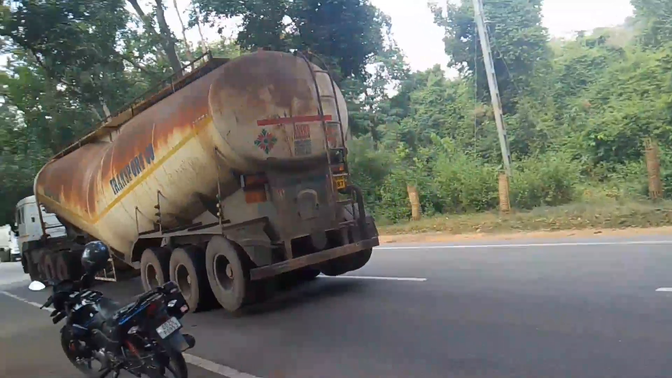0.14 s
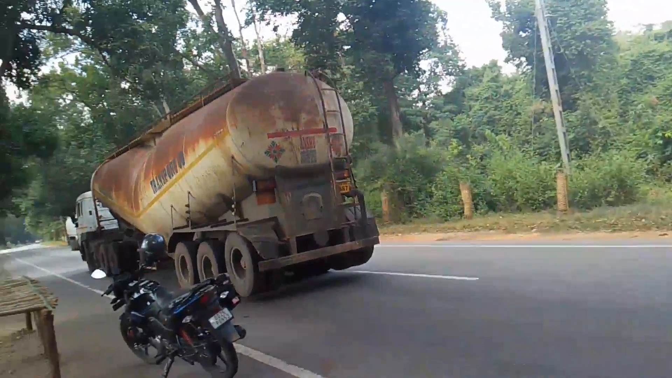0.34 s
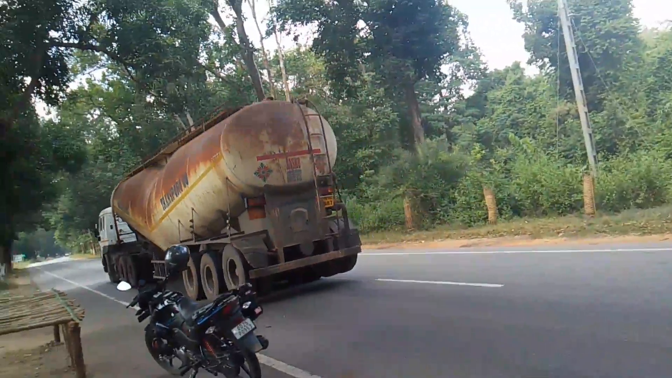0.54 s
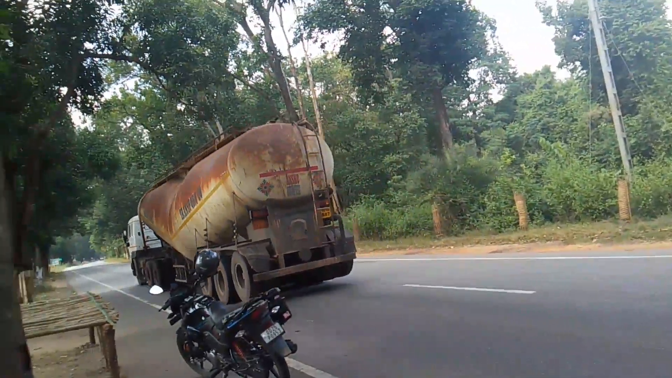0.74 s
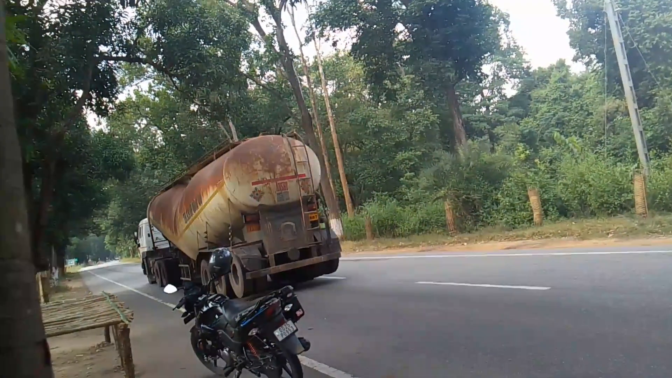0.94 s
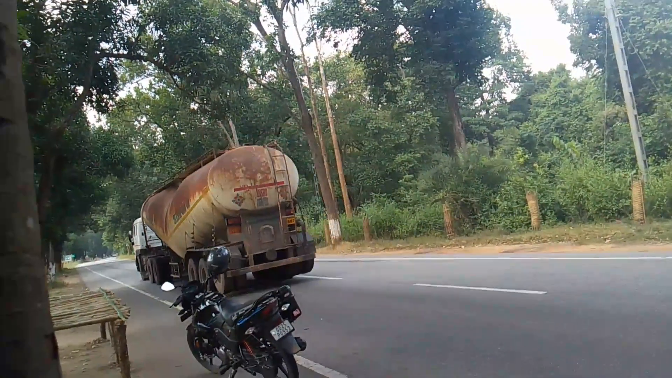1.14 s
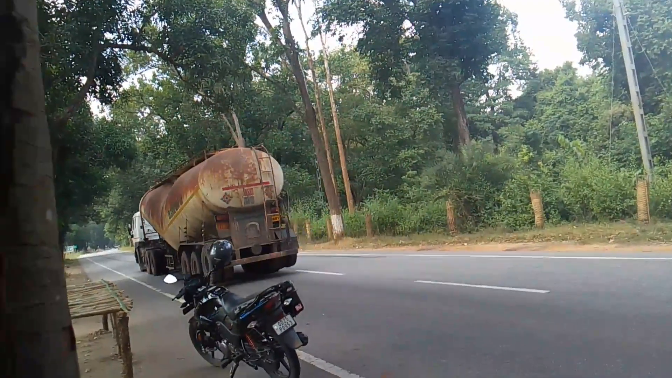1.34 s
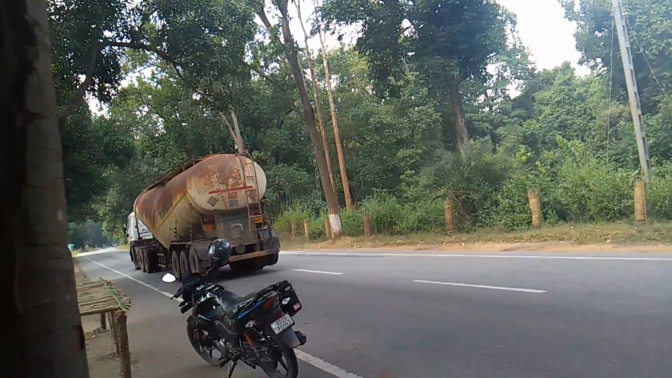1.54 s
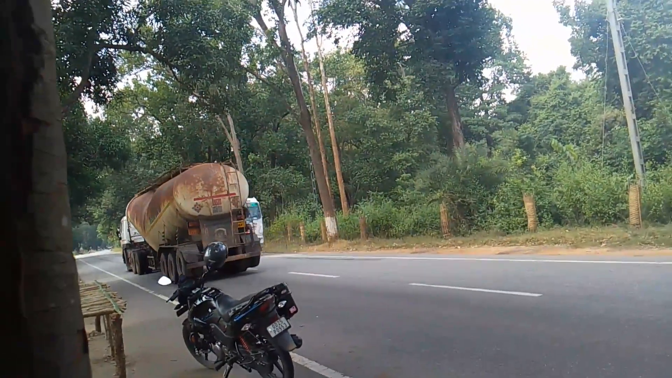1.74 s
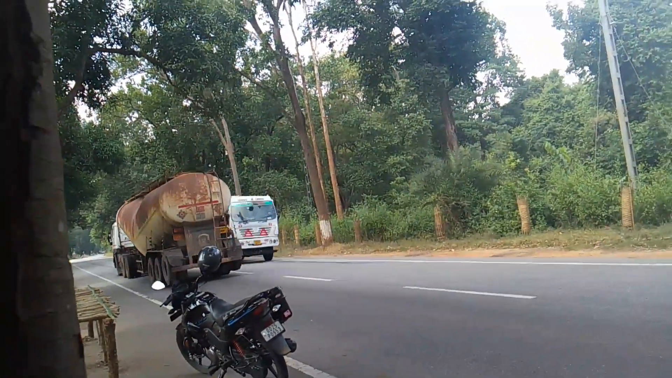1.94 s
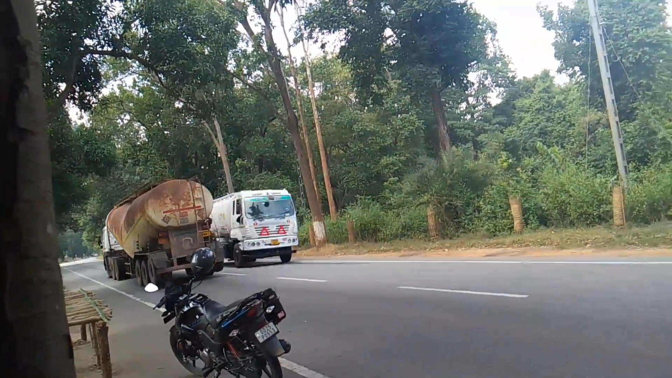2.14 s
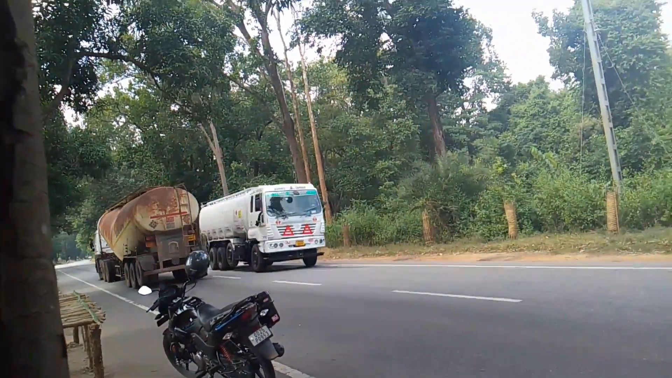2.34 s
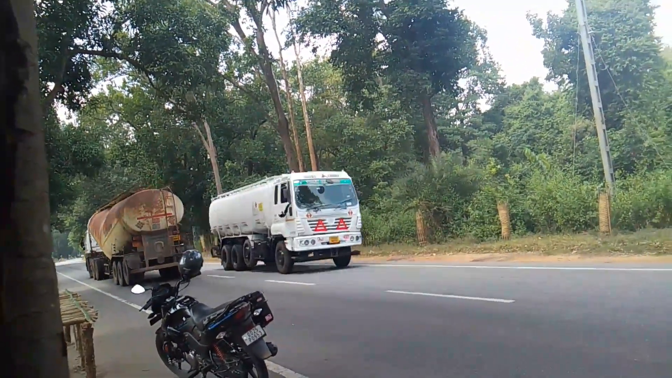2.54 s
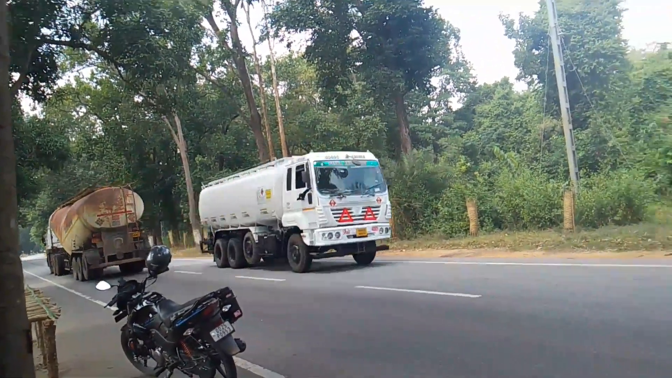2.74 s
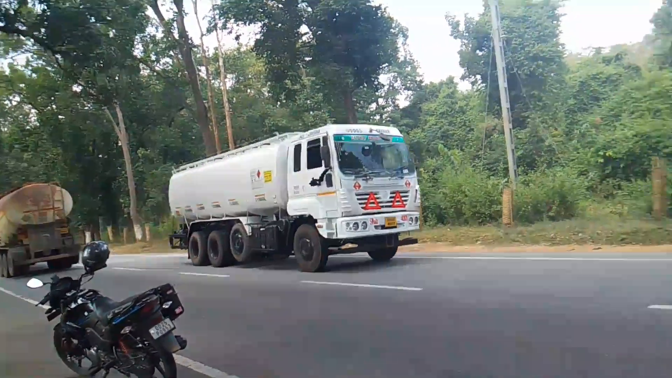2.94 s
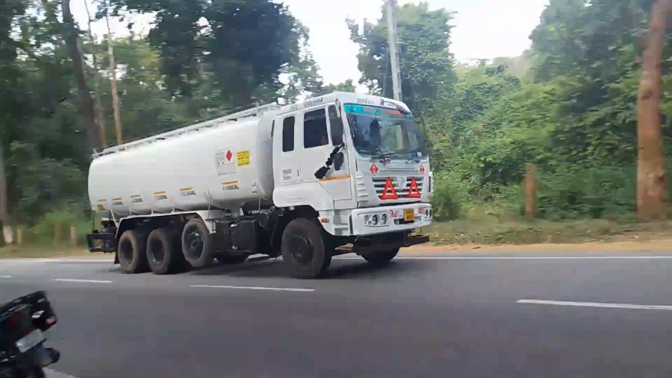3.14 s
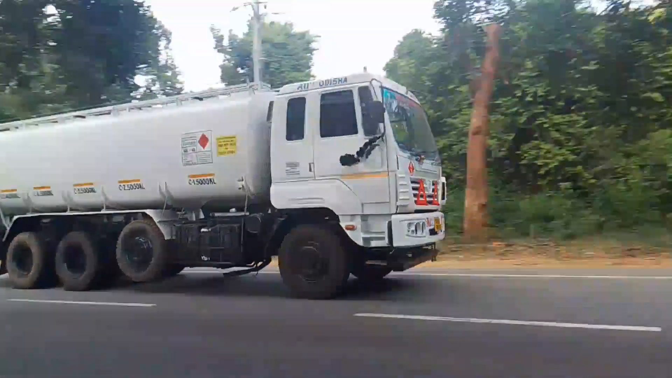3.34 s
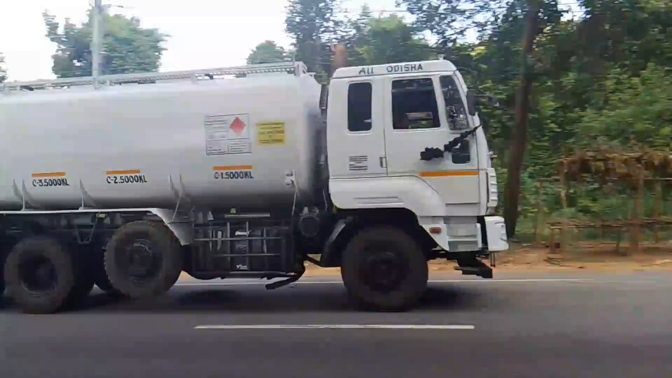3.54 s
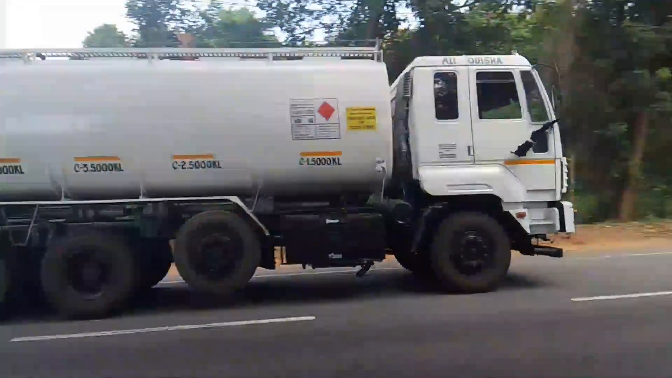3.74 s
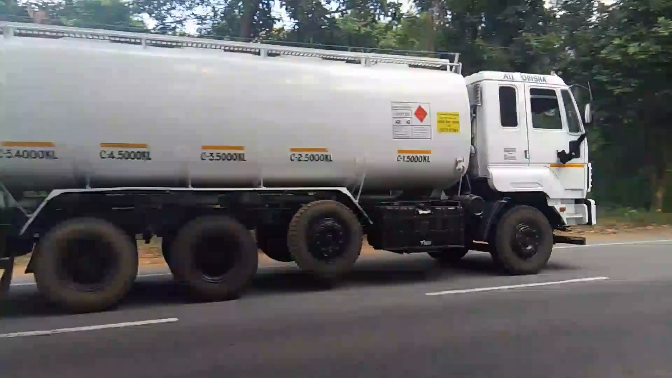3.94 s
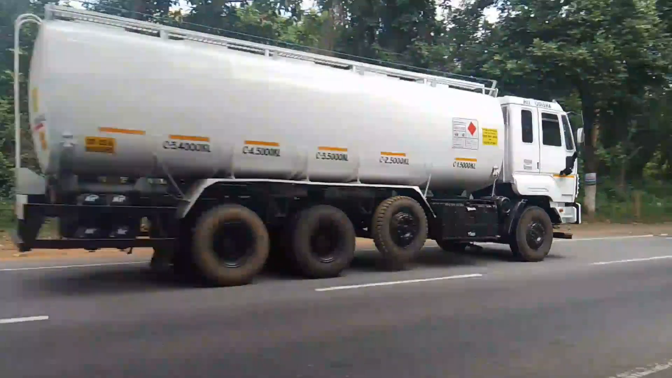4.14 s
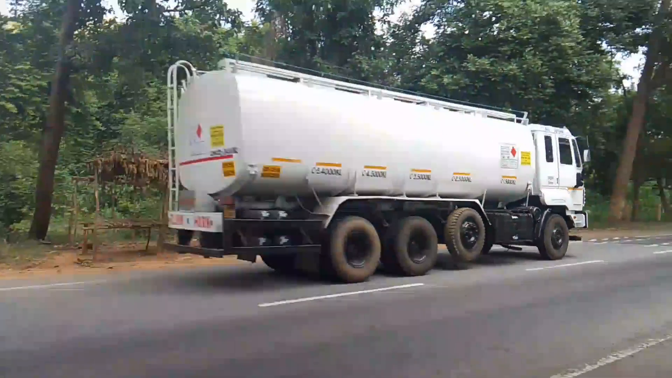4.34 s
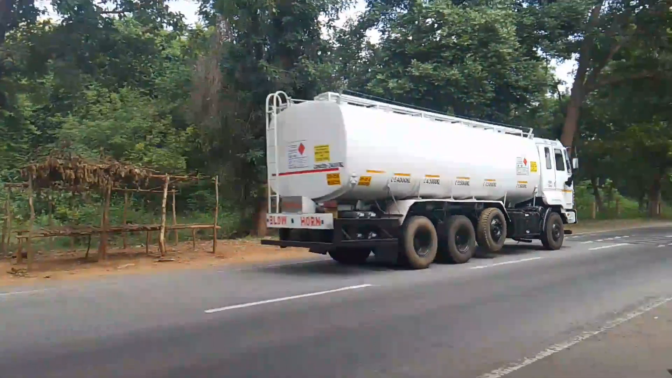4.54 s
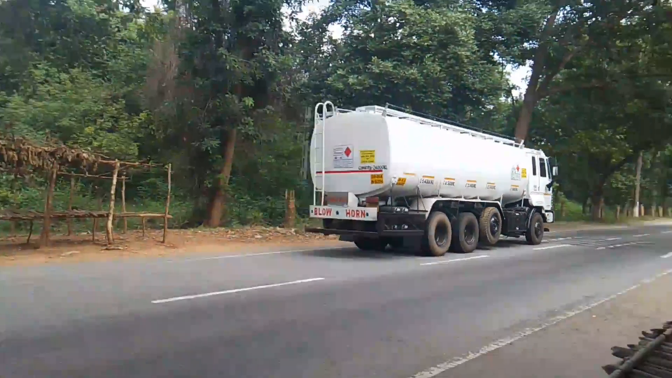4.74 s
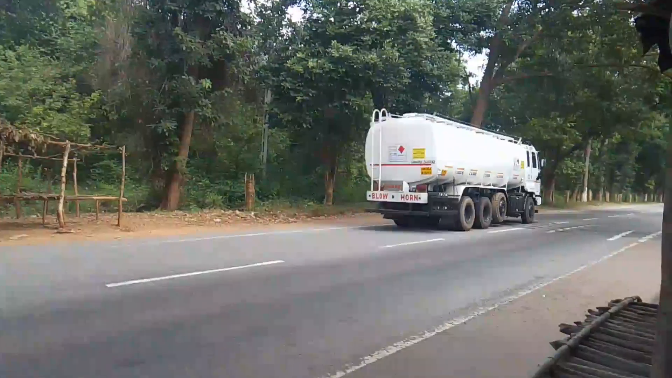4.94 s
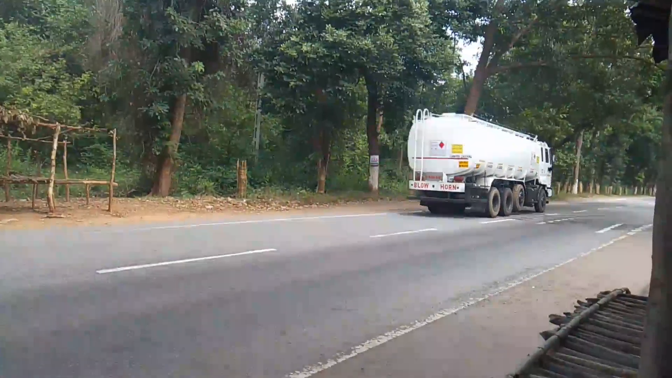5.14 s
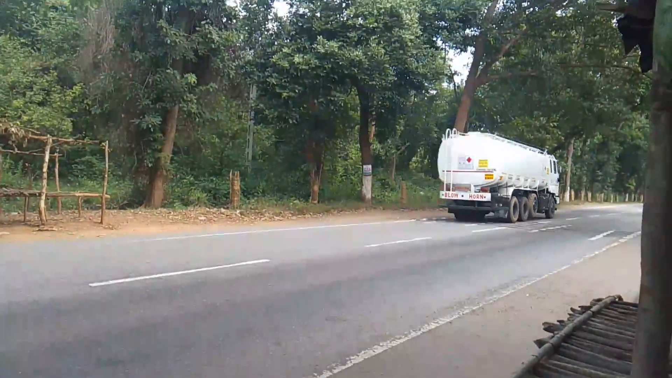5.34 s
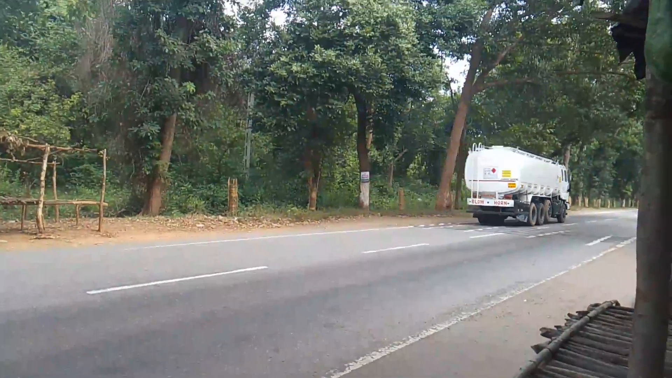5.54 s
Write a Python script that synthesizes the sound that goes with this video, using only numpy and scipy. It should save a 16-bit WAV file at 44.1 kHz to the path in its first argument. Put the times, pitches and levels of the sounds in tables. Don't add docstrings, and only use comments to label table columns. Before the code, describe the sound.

Roadside truck pass: deep steady engine hum recedes, then a second tanker's tyre roar and strong tonal whine swell, peak and fade.

```python
import sys
import numpy as np
from scipy import signal
from scipy.fft import rfft, irfft, next_fast_len
from scipy.io import wavfile
from scipy.ndimage import uniform_filter1d

SR = 44100
rng = np.random.default_rng(int(sys.argv[2]) if len(sys.argv) > 2 else 0)


def amplitude_ratio(level_db):
    exponent = np.asarray(level_db, float) / 20
    return 10 ** exponent


def log_audio(samples):
    frames = np.atleast_2d(samples).T
    limited = np.clip(frames, -1, 1)
    pcm = np.round(limited * 32767).astype(np.int16)
    wavfile.write(sys.argv[1], SR, pcm)


N = 246959
T = np.arange(N) / SR
SPEED_M_S, LANE_M = 14.5, 6

# (time [s], level [dB])
WHINE = [
    (1.4, -68),
    (2.1, -42.5),
    (2.75, -37.5),
    (3.63, -34),
    (3.68, -21),
    (4.25, -16.5),
    (4.66, -26),
    (5.1, -26),
    (5.6, -35.5),
]
# (time [s], change [dB], half-width [s])
BEATS = [(1.93, -15, 0.032), (2.136, 2, 0.027), (2.33, -22, 0.041), (2.42, 9, 0.019), (2.475, -11, 0.014),
         (2.648, 12, 0.0074), (2.87, 5.5, 0.026), (2.92, -17, 0.018), (3.0, 3, .03), (3.08, -12, 0.014),
         (3.11, 7.5, .02), (3.225, -15, .03), (3.48, -2, .03), (3.54, 9, 0.012), (3.57, -8, .012),
         (3.76, 0, .02), (3.83, -7, .022), (3.88, -1, .015), (3.98, -2, 0.034), (4.25, -10, 0.032),
         (4.3, 3.5, 0.021), (4.42, 0, .03), (4.61, -10, 0.0076), (4.64, 2.5, 0.0098), (4.71, -22, 0.021),
         (4.77, 4.5, 0.013), (4.84, -7, 0.029), (4.94, -14, 0.012), (5.07, 0.5, .05), (5.19, -12, 0.011),
         (5.24, -10, 0.02), (5.28, 1, 0.013), (5.33, -13, .01), (5.36, 4, .012), (5.39, -21, 0.015)]
# (time [s], change [dB], half-width [s])
OCTAVE_BEATS = [(2.02, -6, 0.033), (2.28, -7, .04), (2.45, 3, .04), (2.66, -3, 0.036), (2.86, 5, 0.045),
                (2.96, 3, 0.027), (3.04, -4, 0.019), (3.24, -3, 0.035), (3.45, -4, 0.051),
                (3.93, -8, 0.022), (4.2, -10, 0.037), (4.29, 6.5, 0.024), (4.82, -1, 0.049)]
# (time [s], pitch [Hz])
LEAD_AXLE = [(0, 253.1), (3.3, 252), (3.55, 250.3), (3.78, 248), (3.83, 245.7), (3.91, 248), (3.98, 243.8),
             (4.16, 244.1), (4.22, 238.3), (4.36, 238.4), (4.45, 235.3), (4.76, 235.5), (4.88, 232.2),
             (5.23, 233.5), (5.32, 229.7), (5.6, 230.8)]


def treads():
    block_hz, pass_s = 243.5, 4.1
    along = SPEED_M_S * (T - pass_s)
    closing = along / np.hypot(along, LANE_M)
    hz = block_hz / (1 + SPEED_M_S / 343 * closing)

    blur = np.interp(T, [3.4, 3.7, 5.2, 5.4], [0.014, 0.0059, 0.004, 0.014])
    lead = tone(columns(LEAD_AXLE)[0] * (1 + blur * walk(25)))
    stray = tone(hz * (1.03 + 0.018 * walk(24.67)))
    first_db = columns(WHINE)[0] + swells(BEATS, T) + 1.7 * walk(30)

    octave_db = -39 + 0.66 * nearness(T, 3.81, SPEED_M_S) + 2 * shadow(T) + swells(OCTAVE_BEATS, T)
    front_db = np.interp(T, [2.2, 2.4, 3.2, 3.6], [7.5, 4.5, 2.0, -1.5])
    spread = np.interp(T, [3.3, 3.8], [1, 0.35])
    octave = 0
    for detune, axle_db in [(-0.01, -1), (0.02, 2), (0.07, -3)]:
        axle_hz = 2 * hz * (1 + spread * (detune + 0.011 * walk(30)))
        octave = octave + amplitude_ratio(axle_db + 3.5 * walk(14)) * tone(axle_hz)
    upper = 0
    for multiple in (2.45, 3, 3.15, 4, 5):
        upper_hz = multiple * hz * (1 + 0.012 * walk(40))
        upper = upper + amplitude_ratio(-2 * multiple + 4 * walk(25)) * tone(upper_hz)
    overtones = amplitude_ratio(front_db - 5) * octave + amplitude_ratio(-3 - 2 * front_db) * upper
    return amplitude_ratio(first_db) * (lead + amplitude_ratio(-27) * stray) + amplitude_ratio(octave_db) * overtones


# (level abreast [dB], abreast at [s], fall-off re 6 dB per doubling [ratio], source half-length [m])
PASSING = [(-32.5, 4, 0.89, 2.8), (-31.5, 3.97, 1, 2.6), (-36.5, 4.09, 0.9, 9.5), (-46, 4.06, 0.87, 2.6),
           (-48.5, 4.13, 1.2, 0.51)]
# (frequency [Hz], level [dB per Hz])
PASSING_LOW = [(20, -20), (48, -7), (90, -2), (140, -5.5), (180, 2.5), (250, 1)]
PASSING_TONE = [(300, -5), (410, -7), (480, -4.5), (730, -6), (1690, -12), (1930, -16.5), (3850, -19.5),
                (5500, -33), (7500, -35), (10200, -42.5), (11500, -42), (13000, -54.5), (15500, -51)]


def passing_tyres():
    return rolling(PASSING, SPEED_M_S, 1, PASSING_LOW + PASSING_TONE,
                   patchy_db=1.35, flicker_db=-0.12, air=0.37, rear_db=8.5)


# (lowest [Hz], highest [Hz])
BANDS_HZ = [(85, 200), (560, 1000), (1000, 1700), (2200, 5000), (6000, 10500)]
# (time [s], change [dB], half-width [s])
BUMPS = [(0.0, 0.5, 0.046), (0.9, -3, 0.14), (1.2, 3.5, 0.28), (1.75, 3, 0.18), (2.7, 2, 0.12),
         (3.7, 0, 0.073), (4.25, 4, 0.049), (4.55, 3.5, 0.063), (4.92, 0, 0.091), (5.28, 2.5, 0.076),
         (5.45, 4, .04), (5.58, 5, 0.044)]
# (time [s], change [dB], half-width [s])
PUFFS = [
    (5.36, 4, 0.042),
    (5.6, 9.5, 0.013),
]


def rolling(table, speed, hidden, colour, patchy_db, flicker_db, air, rear_db):
    stft = dict(nperseg=1024, noverlap=768)
    hz, s, noise = signal.stft(rng.standard_normal(N), SR, **stft)
    tone_db = colour_db(colour, np.maximum(hz, 1))
    levels = []
    for db, abreast_s, fall, half_m in table:
        levels.append(db + fall * nearness(s, abreast_s, speed, half_m) + hidden * shadow(s))
    levels[0] = levels[0] + swells(BUMPS, s)
    levels[3] = levels[3] + swells(PUFFS, s)

    lifts = []
    for region_db, (lo, hi) in zip(levels, BANDS_HZ):
        inside = (hz > lo) & (hz < hi)
        power = np.sum(amplitude_ratio(2 * tone_db[inside])) / len(hz)
        lifts.append(region_db - 10 * np.log10(power))
    top = lifts[4] + air * (levels[4] + 46.5)
    lifts.append(top + rear_db * np.clip((s - 4.2) / 0.5, 0, 1))

    centres = np.log(list(np.sqrt(np.prod(BANDS_HZ, axis=1))) + [13000])
    weights = np.array([np.interp(np.log(hz + 1), centres, row) for row in np.eye(6)])
    db = tone_db[:, None] + weights.T @ np.array(lifts)
    db = db + patchy_db * patches(db.shape, bins=2, frames=4)
    db = db + flicker_db * patches(db.shape, bins=90, frames=4)
    treble = (hz / (hz + 2500))[:, None]
    sparkle = 1.5 * patches(db.shape, bins=5, frames=3)
    surge = 1.1 * patches(db.shape, bins=150, frames=14)
    db = db + treble * (sparkle + surge)
    return signal.istft(noise * amplitude_ratio(db), SR, **stft)[1][:N]


# (time [s], firing rate [Hz], level [dB])
BOOM = [(0.0, 61.64, -20), (0.11, 62.62, -22.5), (0.76, 62.9, -22), (1.48, 62.58, -25.5),
        (1.87, 64.02, -24), (1.93, 64.18, -31), (2.28, 64.0, -25.5), (2.48, 64.0, -28), (4.21, 64.0, -32),
        (4.65, 65.5, -32.5), (4.66, 65.26, -42.5), (5.18, 65.7, -29.5), (5.22, 64.8, -48),
        (5.26, 67.36, -32), (5.38, 65, -45), (5.44, 64.97, -32), (5.52, 64.9, -37), (5.6, 63.7, -25)]
# (multiple of firing rate [ratio], level [dB])
BOOM_ORDERS = [(1.65, -25), (2, -22), (2.8, -23), (3.4, -26), (4.1, -27), (5, -31), (5.6, -29)]
# (time [s], change [dB], half-width [s])
BOOM_FADES = [
    (1.95, -0.5, 0.1),
    (2.6, -4.5, 0.037),
    (3.85, -0.5, 0.041),
    (4.27, -10, 0.014),
    (4.41, -6, 0.013),
    (4.6, -4, 0.027),
    (4.87, 0, .025),
    (5.33, -6, 0.02),
    (5.6, -7, 0.022),
]


def exhaust():
    hz, db = columns(BOOM)
    sound = amplitude_ratio(0.5 * walk(6.1)) * tone(hz * (1 + 0.001 * walk(12)))
    for multiple, order_db in BOOM_ORDERS:
        order_hz = multiple * hz * (1 + 0.004 * walk(8))
        sound = sound + amplitude_ratio(order_db + 3 * walk(6)) * tone(order_hz)
    return amplitude_ratio(db + swells(BOOM_FADES, T)) * sound


# (level abreast [dB], abreast at [s], fall-off re 6 dB per doubling [ratio], source half-length [m])
LEAVING = [(-35.5, -0.9, 0.82, 0), (-41.5, -0.71, 0.91, 0), (-43.5, -0.51, 1.01, 0),
           (-49.5, -0.86, 0.69, 0), (-55.5, -.6, 0.36, 0)]
# (frequency [Hz], level [dB per Hz])
LEAVING_LOW = [(20, -18), (48, -8), (90, 8.5), (180, 2.5), (250, 8.5)]
LEAVING_TONE = [(300, -6.5), (354, 0.5), (410, -4.5), (630, -9.5), (1000, -14), (1260, -13), (1720, -21),
                (4400, -32), (6000, -39), (10000, -43.5), (12000, -46.5), (13500, -47), (15500, -55)]


def leaving_tyres():
    return rolling(LEAVING, 7.78, 0, LEAVING_LOW + LEAVING_TONE,
                   patchy_db=1.5, flicker_db=0, air=1, rear_db=9)


# (level abreast [dB], abreast at [s], fall-off re 6 dB per doubling [ratio], source half-length [m])
NEXT = [(-34.5, 5.6, 1.7, 0), (-40, 5.58, 2.2, 0), (-41, 5.584, 2.2, 0), (-48, 5.61, 2.7, 0),
        (-51.5, 5.65, 2.2, 0)]


def follower_tyres():
    return rolling(NEXT, SPEED_M_S, 0, PASSING_LOW + PASSING_TONE,
                   patchy_db=2.5, flicker_db=1.57, air=0.43, rear_db=4)


# (time [s], peak level [dB], rise [s])
RATTLES = [(0.0553, -36.5, 0.011), (0.0794, -42, 0.021), (0.3294, -40, 0.015), (0.3594, -44, 0.019),
           (0.4594, -43, 0.0096), (0.565, -41, 0.017), (0.5994, -44, 0.016), (1.5194, -44, 0.012),
           (2.9253, -49, 0.0081), (3.1194, -41, 0.012), (3.1894, -41, 0.014), (3.3408, -36, 0.014),
           (3.3662, -41, 0.0083), (3.4394, -37, 0.0091), (3.7883, -35, 0.0061), (4.0267, -45.5, 0.0059),
           (4.09, -42, 0.0081), (4.1669, -47, 0.0087), (4.2194, -33, 0.0074), (4.2936, -37, 0.02),
           (4.3166, -43, 0.014), (4.6594, -35, 0.009), (4.9162, -54, 0.0091), (4.9422, -36, 0.0093),
           (5.1494, -39, 0.0083), (5.4665, -50, 0.012), (5.4904, -50, 0.013), (5.5794, -31, 0.014)]


def rattles():
    colour = [(1500, -20), (3200, 0), (6000, -6), (10000, -11), (12000, -21), (15500, -36)]  # (Hz, dB)
    clatter = coloured(colour) * amplitude_ratio(1.8 * walk(150))
    out = np.zeros(N)
    for s, db, rise_s in RATTLES:
        i = int(s * SR)
        t = np.arange(min(N - i, int(0.2 * SR))) / SR / rise_s
        swell = (t * np.exp(1 - t)) ** 1.17
        out[i:i + len(t)] += amplitude_ratio(db - 12) * swell * clatter[i:i + len(t)]
    return out


# (time [s], peak level [dB])
TICKS = [(1.26, -60), (1.3433, -57), (1.4606, -57), (2.3037, -56), (2.5112, -53), (2.7177, -50),
         (2.9253, -45), (3.0305, -54), (3.3408, -44), (3.6745, -46), (4.0253, -44), (4.0886, -42),
         (4.2497, -41), (4.9132, -49), (4.9467, -45), (5.1512, -43), (5.246, -50), (5.5872, -40),
         (5.591, -41), (5.595, -39), (5.598, -41)]


def ticks():
    out = np.zeros(N)
    for s, db in TICKS:
        out[int(s * SR)] = amplitude_ratio(db + 16)
    sos = signal.butter(3, [8500, 12000], "band", fs=SR, output="sos")
    return signal.sosfilt(sos, out)


# (frequency [Hz], level [dB per Hz])
DUST = [(3000, -39), (6000, 1), (7200, 4), (9000, -8), (12000, -8), (15500, -15)]


def dust():
    db = -50 + 1.5 * nearness(T, 4.22, SPEED_M_S)
    return coloured(DUST) * amplitude_ratio(db + 0.5 * walk(9) + 2 * walk(120))


# (time [s], flutter change [dB], buffet change [dB], half-width [s])
GUSTS = [(0.0, 17, -2, 0.055), (2.06, -1, 4, .08), (2.95, 7, 11, 0.13), (3.2, 9, 11, 0.06),
         (3.55, 4, 14, 0.13), (3.9, 11, 4, 0.048), (4.3, 0, 0, .05), (4.62, 0, 16, 0.066),
         (4.87, -8, 14, 0.066), (5.2, 9, 12, 0.1), (5.44, 3, 11, 0.059), (5.6, -12, 1, 0.05)]


def wake():
    stirred = amplitude_ratio(nearness(T, 4.4, SPEED_M_S))
    s, flutter_change, buffet_change, width = np.transpose(GUSTS)
    flutter_db = -54 + 14 * stirred + swells(zip(s, flutter_change, width), T)
    buffet_db = -44.5 + 1.5 * stirred + swells(zip(s, buffet_change, width), T)
    flutter = amplitude_ratio(flutter_db - 2 + 2 * walk(22)) * band(29, 43)
    buffet = amplitude_ratio(buffet_db - 4.5 + 2 * walk(22)) * band(77.6, 93.4)
    return flutter + buffet


def nearness(t, abreast_s, speed, half_length=0):
    gap_m = np.maximum(speed * np.abs(t - abreast_s) - half_length, 0)
    return -10 * np.log10(1 + (gap_m / LANE_M) ** 2)


def shadow(t):
    emerges_s, takes_s = 2.22, 0.12
    return -8 / (1 + np.exp((t - emerges_s) / takes_s))


def swells(rows, t):
    return sum(db * np.exp(-0.5 * ((t - s) / width) ** 2) for s, db, width in rows)


def colour_db(colour, hz):
    port_hz, port_width_hz, port_db = 8450, 1600, 9.9
    colour_hz, db = np.transpose(colour)
    ring = port_db / (1 + (2 * (hz - port_hz) / port_width_hz) ** 2)
    return np.interp(np.log(hz), np.log(colour_hz), db) + ring


def coloured(colour):
    size = next_fast_len(N)
    hz = np.maximum(np.fft.rfftfreq(size, 1 / SR), 1)
    spectrum = amplitude_ratio(colour_db(colour, hz)) * rfft(rng.standard_normal(size))
    return unit_rms(irfft(spectrum, size)[:N])


def patches(shape, bins, frames):
    field = rng.standard_normal(shape)
    for _ in range(2):
        field = uniform_filter1d(field, bins, axis=0)
        field = uniform_filter1d(field, frames, axis=1)
    return field / field.std()


def columns(table):
    s, *values = np.transpose(table)
    return [np.interp(T, s, v) for v in values]


def walk(rate):
    knots = 1.2 * rng.standard_normal(1000)
    return np.interp(T * rate, np.arange(1000), knots)


def tone(hz):
    turns = np.cumsum(hz) / SR + rng.random()
    return np.sqrt(2) * np.sin(2 * np.pi * turns)


def band(lo_hz, hi_hz):
    sos = signal.butter(2, [lo_hz, hi_hz], "band", fs=SR, output="sos")
    return unit_rms(signal.sosfilt(sos, rng.standard_normal(N)))


def unit_rms(x):
    return x / np.sqrt(np.mean(x ** 2))


def scene():
    passing = treads() + passing_tyres()
    leaving = exhaust() + leaving_tyres()
    loose = rattles() + ticks() + dust()
    return (passing + leaving + follower_tyres() + loose + wake())[None]


def band_limit(x):
    return signal.sosfilt(signal.butter(12, 15570, fs=SR, output="sos"), x)


def record(dry):
    mix = dry + 0.0114
    return band_limit(mix)


dry = scene()
out = record(dry)
log_audio(out)
```